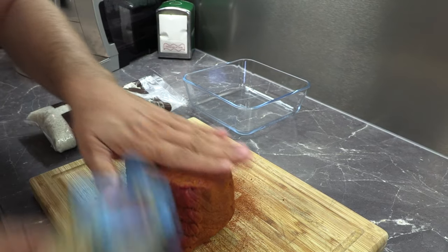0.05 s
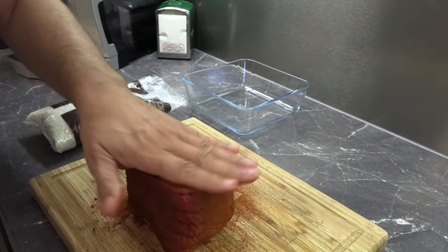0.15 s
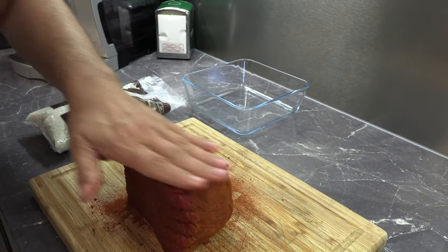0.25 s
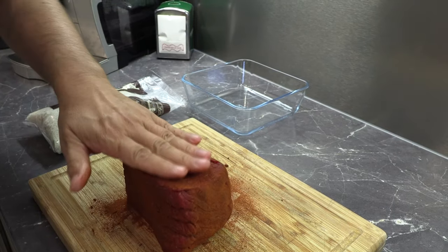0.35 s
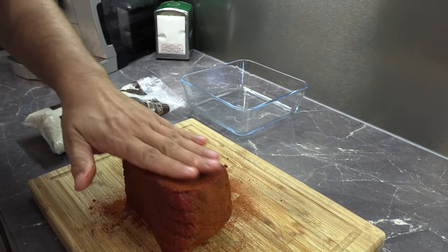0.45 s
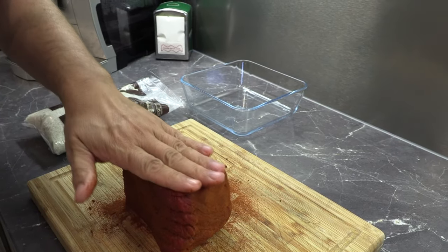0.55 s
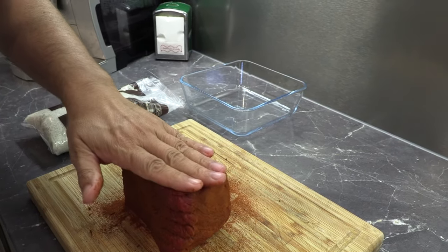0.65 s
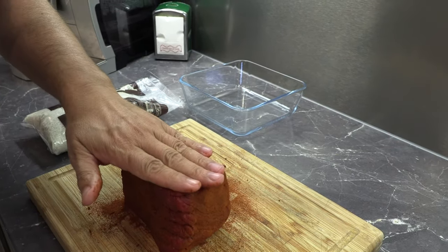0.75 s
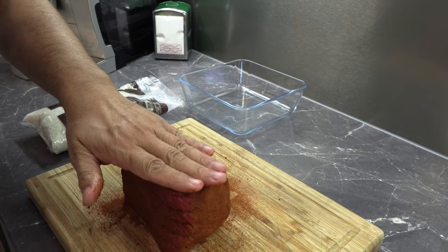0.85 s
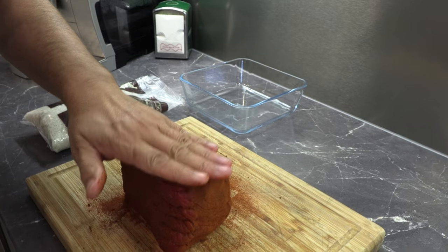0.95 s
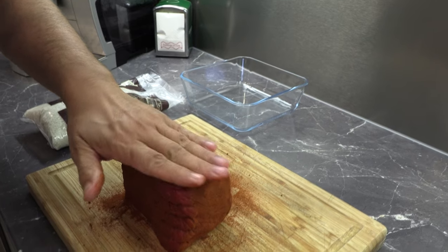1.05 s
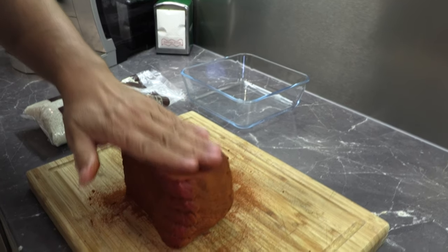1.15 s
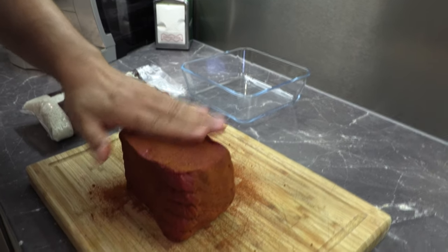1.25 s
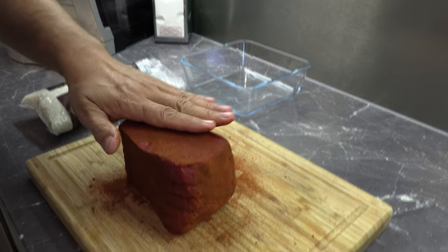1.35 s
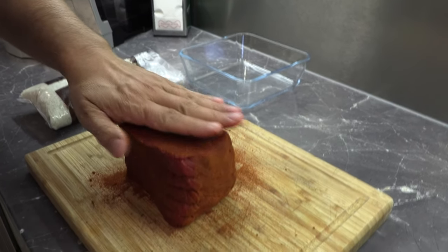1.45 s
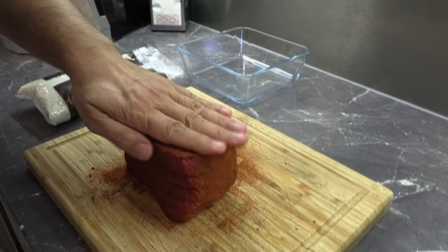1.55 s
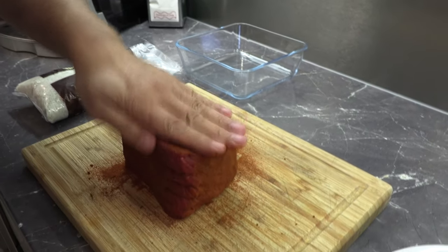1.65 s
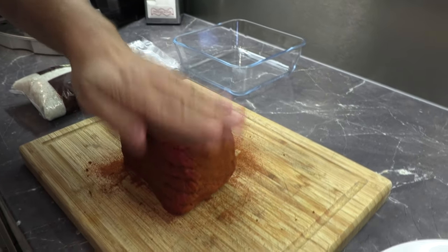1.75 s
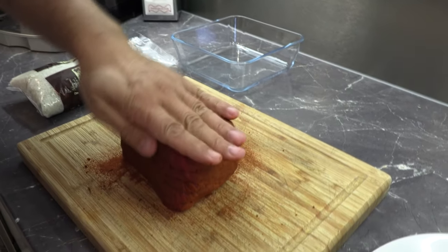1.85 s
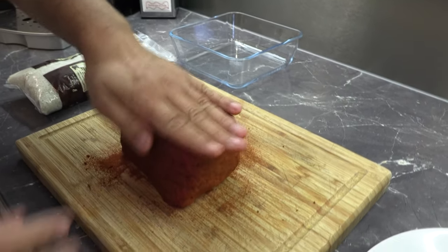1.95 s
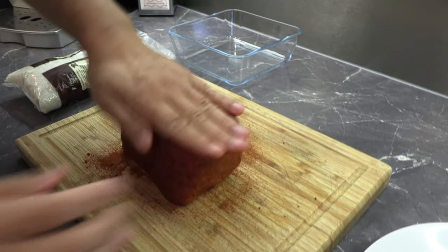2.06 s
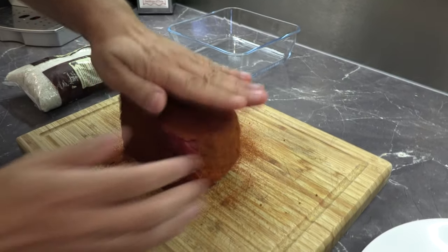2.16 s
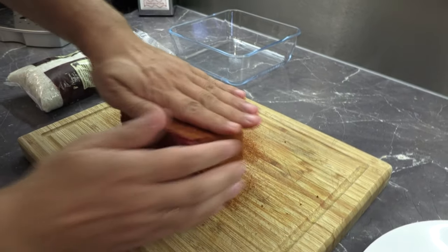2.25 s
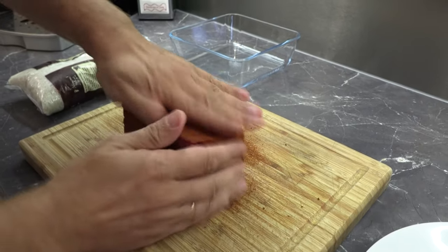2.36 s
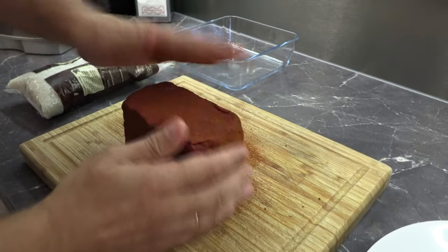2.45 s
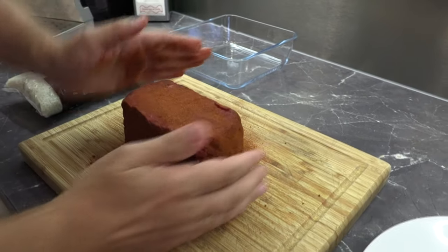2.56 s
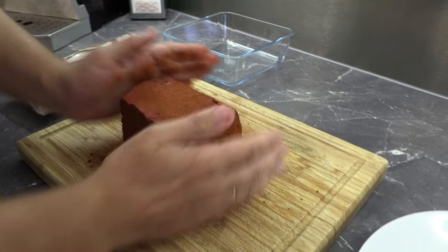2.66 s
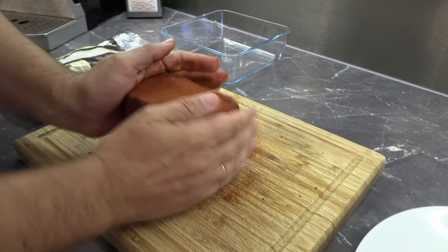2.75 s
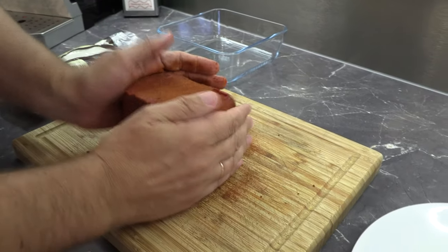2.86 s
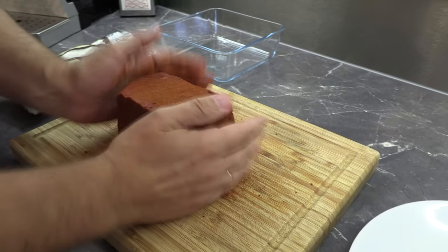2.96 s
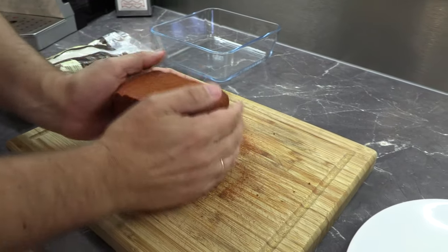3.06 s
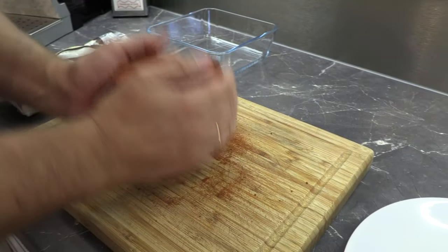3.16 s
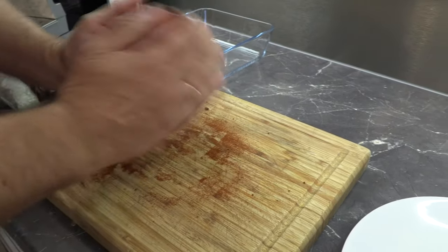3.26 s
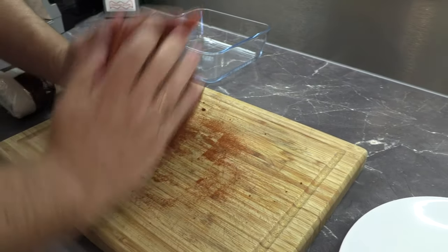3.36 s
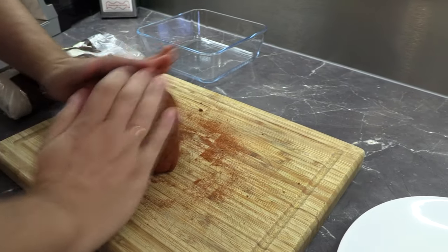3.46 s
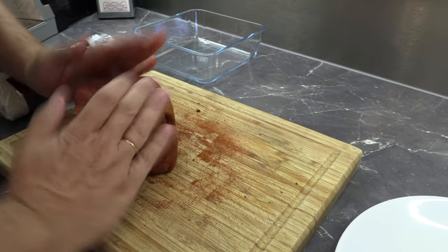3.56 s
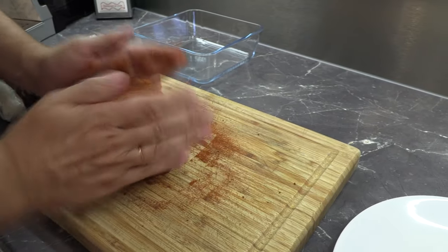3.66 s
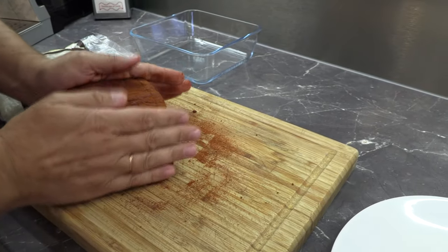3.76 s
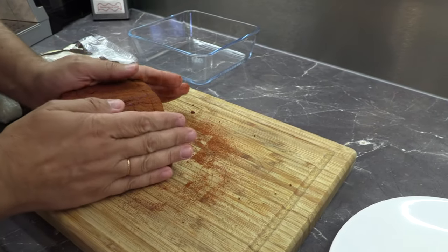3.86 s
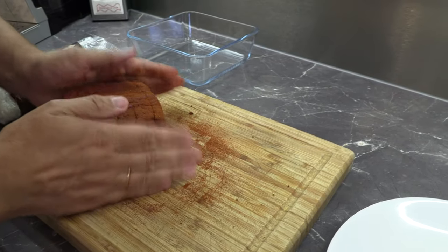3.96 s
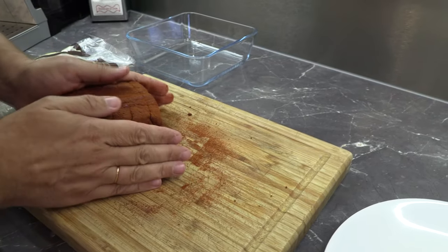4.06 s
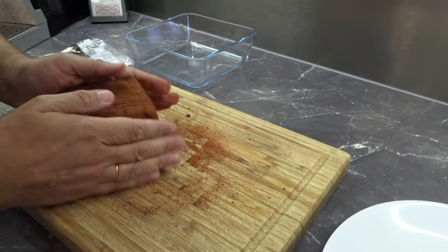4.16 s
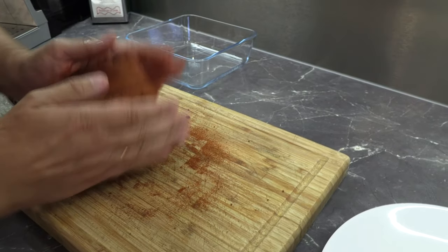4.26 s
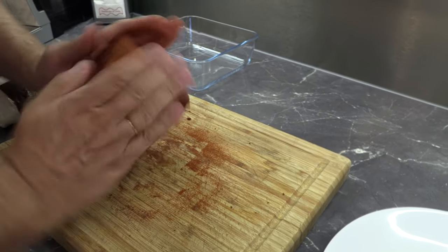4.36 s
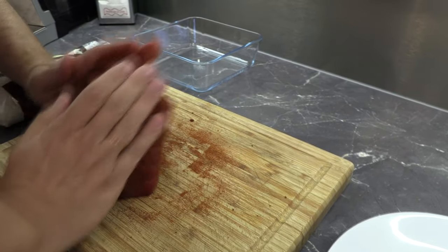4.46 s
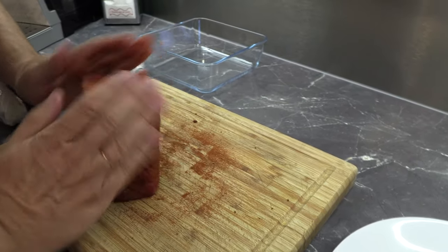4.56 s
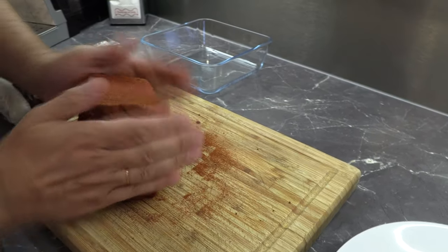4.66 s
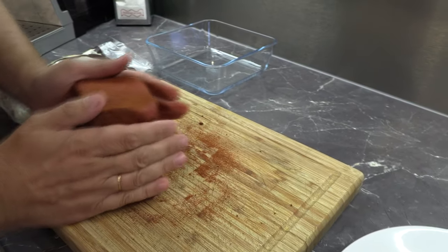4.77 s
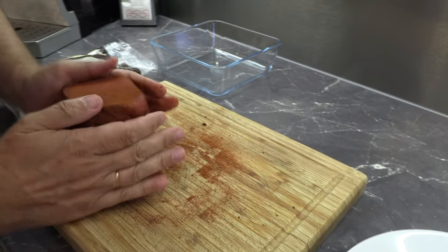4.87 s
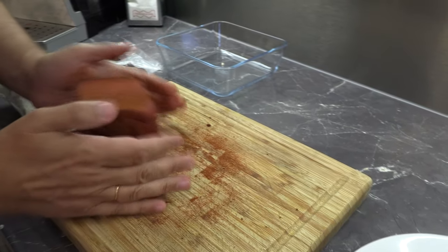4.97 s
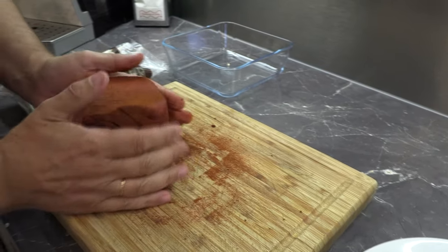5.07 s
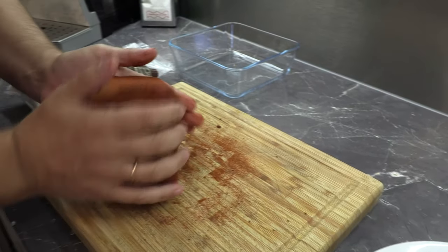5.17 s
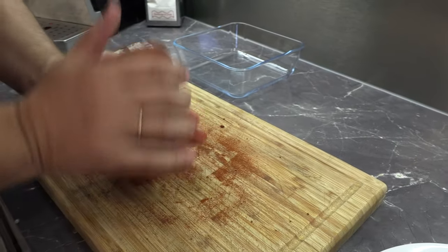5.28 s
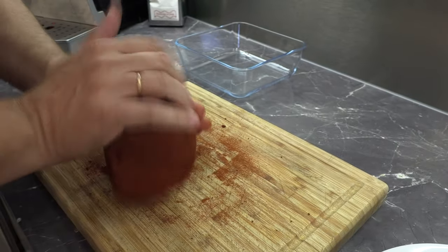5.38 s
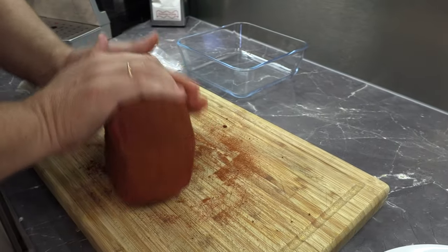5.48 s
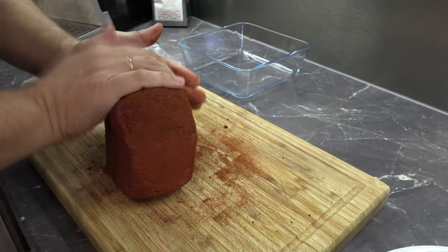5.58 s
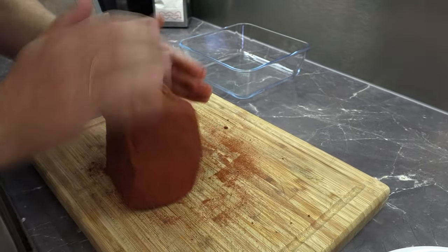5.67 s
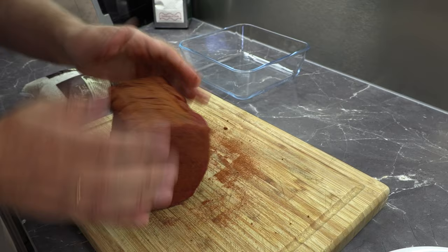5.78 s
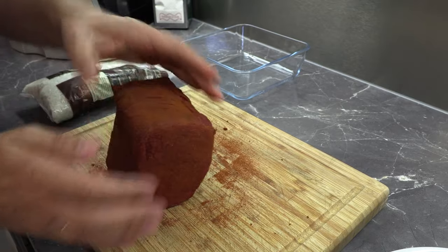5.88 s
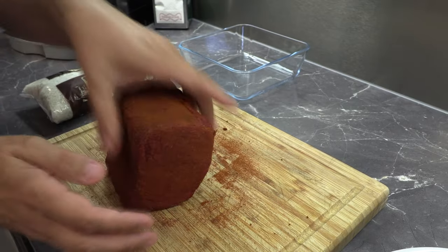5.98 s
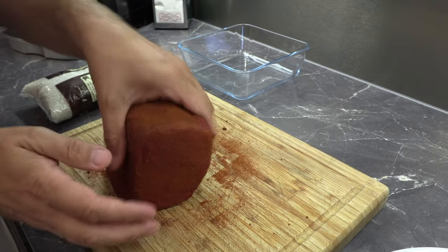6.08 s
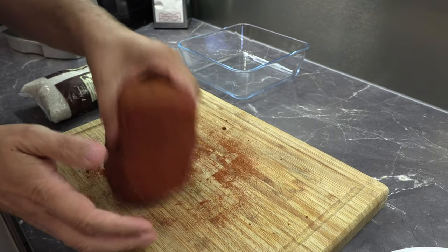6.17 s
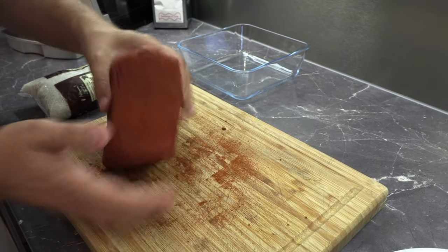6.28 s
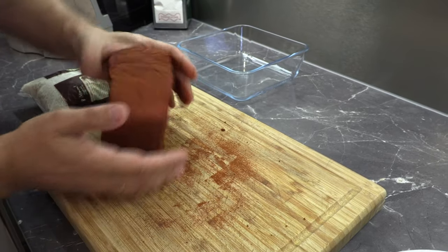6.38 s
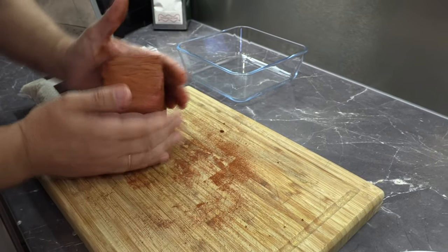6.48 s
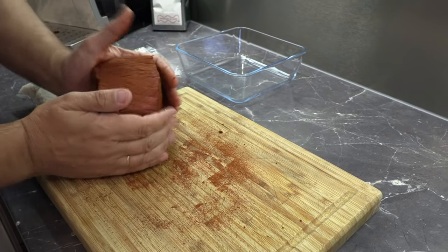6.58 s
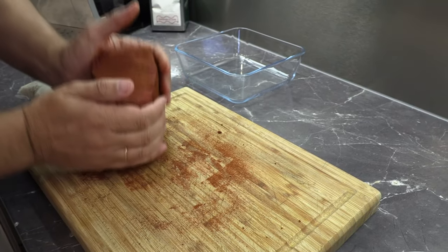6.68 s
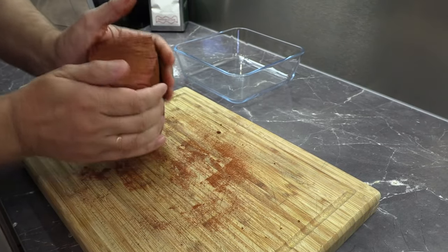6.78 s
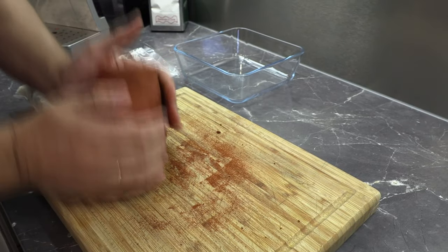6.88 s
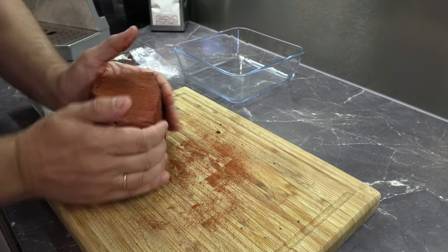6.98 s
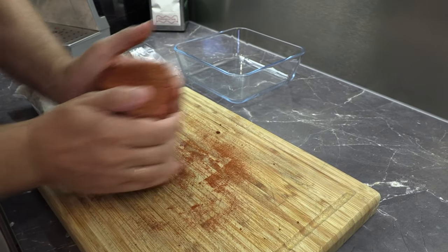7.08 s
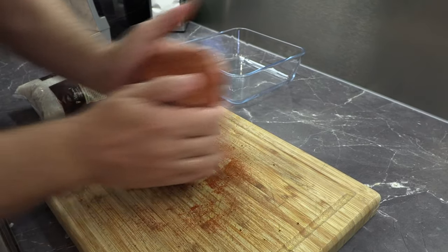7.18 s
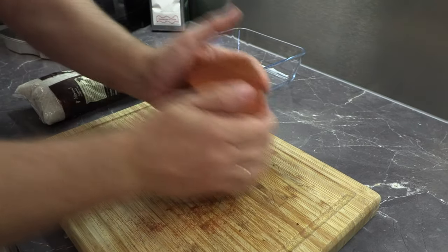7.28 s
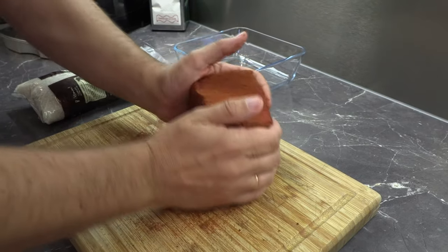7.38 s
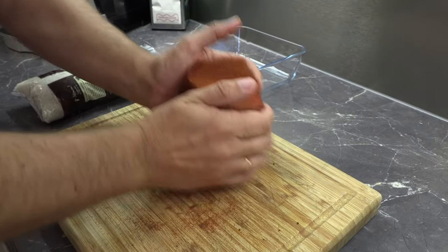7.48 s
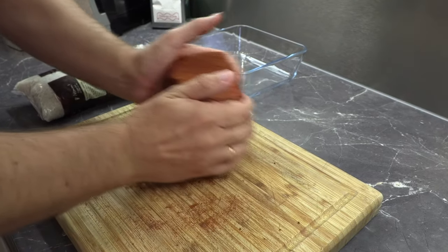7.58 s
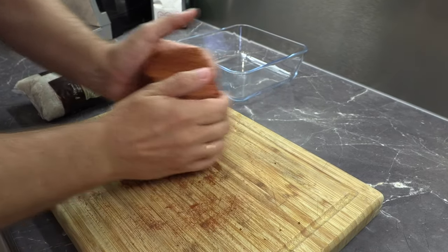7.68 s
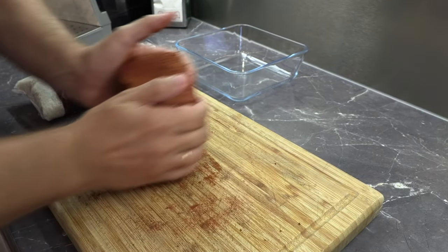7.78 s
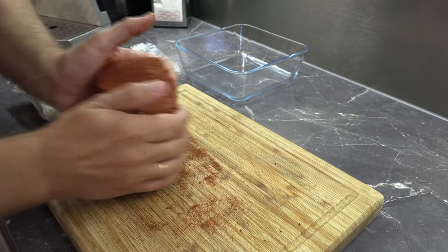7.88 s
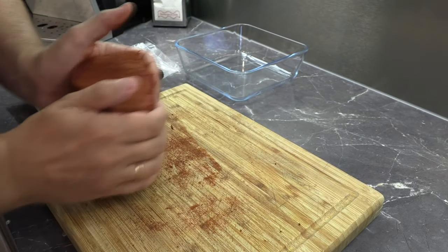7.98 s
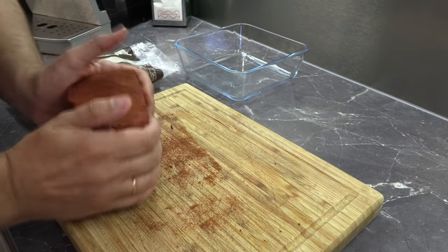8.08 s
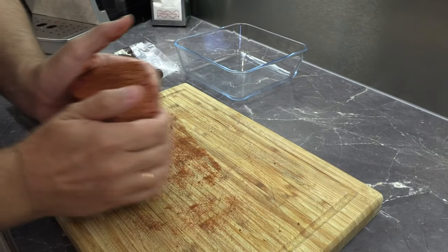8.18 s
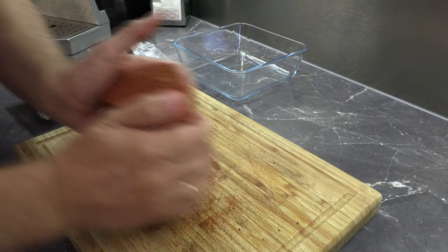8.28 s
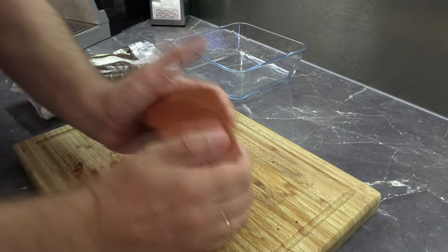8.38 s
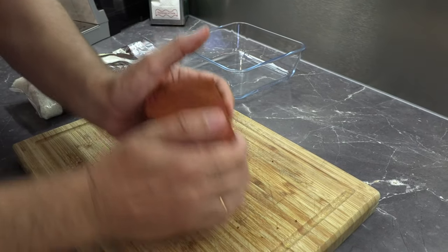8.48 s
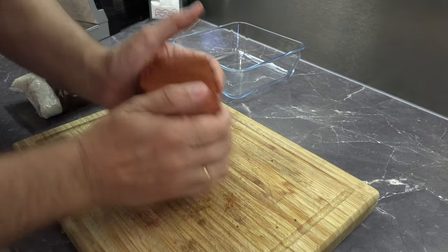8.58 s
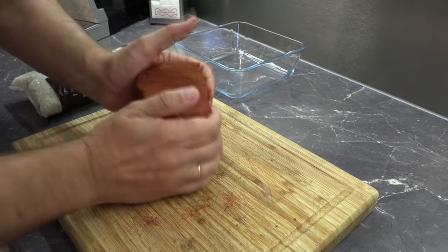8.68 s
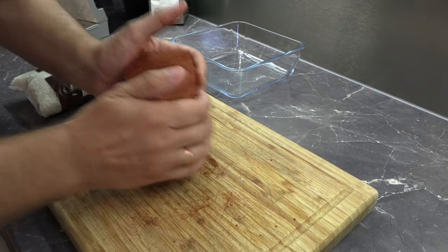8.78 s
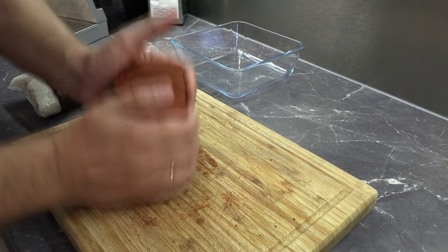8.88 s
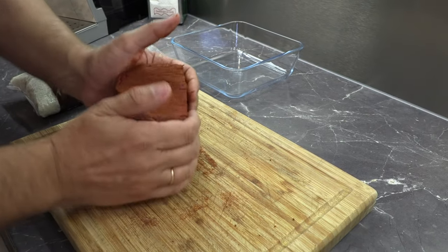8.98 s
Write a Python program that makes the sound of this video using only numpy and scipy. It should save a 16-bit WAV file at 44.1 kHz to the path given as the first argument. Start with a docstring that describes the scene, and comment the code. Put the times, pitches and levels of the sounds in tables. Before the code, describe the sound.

Close kitchen handling: hollow box clacks, a brief glassy ring, a sharp meaty slam, then uneven pats, board knocks and dry powdery rubbing.

```python
"""A box clacks down on a stone counter and a nudged dish rings; then meat thuds and a board knocks.
Two hands turn the spice-coated meat and tamp it on the wooden board, while powder rasps under the palms.
Blows are a snap plus random small contacts, coloured by a resonant body; rasps are grainy noise.
Ringing things are fading sine waves, and trapped air pops in short notes.
A small, hard kitchen answers with echoes and reverb, over quiet air and a deep rumble."""
import sys
import numpy as np
from scipy import signal
from scipy.fft import rfft, irfft
from scipy.io import wavfile
from scipy.ndimage import uniform_filter1d

SR = 44100
rng = np.random.default_rng(int(sys.argv[2]) if len(sys.argv) > 2 else 0)


def to_wav(sig):
    """Store sig (one row per channel, or 1-D mono) as 16-bit WAV at the path in sys.argv[1].

    Samples outside -1..1 are clipped; the rate is SR.
    """
    pcm = np.clip(np.atleast_2d(sig), -1, 1) * 32767
    pcm = np.round(pcm).astype(np.int16)
    wavfile.write(sys.argv[1], SR, pcm.T)  # frames by channels


N = 398223  # length in samples

# Levels in the tables and settings are those before the mixing gains in the functions.

# Room air. Each row: frequency in Hz, level in dB per Hz.
AIR_SPECTRUM = [(60, -14), (130, -13), (250, -6), (450, -7.5), (800, -11.5), (1400, -10.5), (2300, -8),
                (3200, -13), (5000, -17), (7500, -20), (9500, -25), (15500, -33)]
# Steady drone of the kitchen. Each row: frequency in Hz, width in Hz, lift in dB.
AIR_RESONANCES = [(117.8, 10, 4), (330, 12, 6), (620, 41, 6), (1844, 100, 8.5)]
# Noise in the two microphones. Each row: frequency in Hz, left minus right in dB.
NOISE_SHADE = [(100, 3), (250, -4.5), (500, -6.5), (1000, -11), (2000, -15), (4000, -5.5), (8000, -5.5),
               (12000, 3)]
# Deep rumble. Each row: frequency in Hz, level in dB per Hz.
RUMBLE_SPECTRUM = [(8, -48), (20, 6), (29, 3), (40, -14), (60, -20), (100, -36.5), (200, -50.5),
                   (600, -100)]
AIR_DB, RUMBLE_DB = -60, -49
SWELL_AT_S, SWELL_WIDTH_S, SWELL_DB = 2.1498, 0.17, 17.5  # one deep low-frequency swell

# How long the room rings. Each row: frequency in Hz, time to fall by 60 dB in seconds.
ROOM_FADE = [(100, 0.5194), (200, 0.15), (350, 0.34), (700, 0.58), (1800, 0.6), (4500, 0.48), (8000, 0.4),
             (15000, 0.35)]
# Colour of the reverb. Each row: frequency in Hz, level in dB.
ROOM_COLOUR = [(60, 4), (200, 3), (450, -0.5), (900, -4), (1600, -2.5), (3000, -5.5), (7500, -1.5),
               (14000, -3)]
# Resonances of the room. Each row: frequency in Hz, width in Hz, lift in dB.
ROOM_RESONANCES = [(112.93, 27, 2.2), (590, 130, 3), (1110, 200, 1.9)]
# Echoes from the nearest walls. Each entry: delay in seconds.
ECHO_DELAYS = [.00545, .007, .0105, .0173]
# Strength of those echoes. Each entry: level in dB.
ECHO_LEVELS = [-12.5, -24.5, -15, -19]
ECHO_CORNER_HZ = 2200

# Ringing of the counter. Each row: frequency in Hz, time to fall by 60 dB in seconds, level in dB,
# swell time in seconds, how much higher the pitch starts in Hz (negative starts lower).
COUNTER_MODES = [(119.01, 0.45, -18.5, .004, 1.5), (163, 0.25, -14, .008, 16), (317.7, 0.2, 0.5, 0.02, 25),
                 (564, 0.55, -15.5, .004, -9.5), (1114, 0.44, -26, .004, 0.5)]
BEND_S = 0.03  # time for the pitch to settle

# Ringing of the dish. Each row: frequency in Hz, level in dB, time to fall by 60 dB in seconds.
DISH_MODES = [(1098, -6, .35), (1631, -8.5, 1.75), (2250, -2, 1.1), (2961, -2, .55), (3806, -17, .42),
              (4748, -12, .31), (6056, -19, .45), (7418, -19, .38), (8210, -14, .24)]
# Touches of the dish. Each row: start in seconds, level in dB.
DISH_NUDGES = [(1.441, -56), (1.514, -33.5)]
DISH_BASE_SPLIT_HZ, DISH_TWIN_DB = 11, -13  # each mode has a weaker twin; the split varies around this
TINK_AT_S, TINK_HZ, TINK_T60_S, TINK_DB = 5.487, 2190, 0.19, -36

# Blows spread over two microphones. Each row: frequency in Hz, left minus right in dB.
BLOW_SHADE = [(120, 6), (250, -1), (500, 3), (1000, -12), (2000, -13.5), (4000, -7.5), (8000, -11),
              (12000, 4)]
# How alike left and right are in a blow. Each row: frequency in Hz, likeness from 0 to 1.
BLOW_LIKENESS = [(100, 0.85), (500, 0.6807), (1000, 0.49), (2000, 0.89), (5000, .6), (12000, .4)]

# Box on the counter. Each row: start in seconds, level in dB, contact corner in Hz, bass in dB,
# rise in seconds, hollow resonance in Hz, hollow lift in dB.
BOX_CONTACTS = [(0.4737, -21.5, 5650, 2, 0.0003, 2330, 1.5), (.562, -37, 2186, 15, 0.0022, 603.2, 13),
                (0.6207, -22, 6936, -3, 0.0047, 1950, 4), (0.8298, -31.5, 12410, 5, 0.0003, 2860, 0.5),
                (0.8529, -30, 3000, 13.5, 0.0004, 710, 9), (.866, -38.5, 1195, 17, 0.002, 239, 10),
                (1.4177, -24.5, 6540, 0.5, 0.0003, 587.3, 10.5),
                (1.4215, -21.5, 6540, -1, 0.00039, 1300, 6.5), (1.4418, -22, 6906, 0.5, 0.00082, 1280, 8.5),
                (1.449, -28, 5000, -5, 0.00084, 560, 8), (1.458, -25, 4997, -6, 0.001, 288, 15.5),
                (1.5127, -27.5, 12000, -5, 0.0025, 536, 16)]
# Colour of the hollow box. Each row: frequency in Hz, level in dB per Hz.
BOX_COLOUR = [(50, -46), (130, -22), (250, -12.5), (450, -6.5), (1300, -3), (1900, -2.5), (2500, 0),
              (3100, -5), (3700, -15), (5500, -24.5), (8000, -27.5), (9500, -30.5), (15000, -46)]
# Resonances of the box. Each row: frequency in Hz, width in Hz, lift in dB.
BOX_RESONANCES = [(614, 38.1, 2), (780, 160, 3.5), (1234, 110, 3), (1473, 60, 2.5), (2340, 180, 0),
                  (5350, 400, 5), (7900, 900, 4.5)]
# How far each source stands toward the right microphone, on a scale of 0 to 1.5.
BOX_SIDEWAYS, KNOCK_SIDEWAYS, PAT_SIDEWAYS = 0.77, 0.71, 0.72

# Palms and meat rubbing in the powder. Each row: start in seconds, length in seconds, level in dB.
POWDER_RUBS = [(0.972, 0.063, -51.5), (1.251, 0.1, -67), (2.113, 0.024, -63.5), (2.191, 0.029, -61.5),
               (2.599, 0.12, -67), (2.696, 0.007, -55), (3.034, 0.11, -59), (3.547, 0.049, -58),
               (4.07, 0.052, -58.5), (4.169, 0.06959, -51), (4.221, 0.17, -63.5), (5.079, 0.041, -56),
               (6.344, 0.16, -62.5), (7.51, 0.41, -55.5)]
# Colour of the powder grains. Each row: frequency in Hz, level in dB per Hz.
GRIT_SPECTRUM = [(150, -5.5), (600, 1.5), (1500, 3), (2500, 5.5), (4500, -3), (8000, -9), (10000, -16),
                 (15000, -23.5)]
PUFF_S, PUFF_LEAD_S = 0.038, 0.006  # a pat's scuff starts just before it lands
PUFF_DB, PUFF_AT_HZ, PUFF_DB_PER_OCTAVE = -58.5, 3000, 2.5  # brighter contacts scuff more

# Air squeezed out from under the meat. Each row: time of the peak in seconds, pitch in Hz, level in dB.
AIR_POPS = [(5.489, 830, -25.5), (7.384, 845, -45), (8.1115, 870, -28), (8.7325, 827, -27)]
POP_S = 0.0035  # half the length of a pop

# Colour of the board. Each row: frequency in Hz, level in dB per Hz.
BOARD_COLOUR = [(40, -26.5), (100, -3), (180, 0.5), (280, -1.5), (450, -1.5), (800, 1), (1300, -3),
                (1700, -3), (2150, -2), (2700, -5.5), (3700, -16), (8000, -27), (10000, -37.5),
                (15000, -50.5)]
# Resonances of the board. Each row: frequency in Hz, width in Hz, lift in dB.
BOARD_RESONANCES = [(207, 70, 1.7), (336, 60, 4.4), (565, 70, 5.5), (715, 50, 2.5), (882.3, 60, 1.8),
                    (1110, 56, 2.5), (1304, 89, 4), (1480, 90, 2), (2090, 200, 2.8)]
# The board knocks on the counter. Each row: start in seconds, level in dB.
BOARD_KNOCKS = [(6.499, -27), (6.6577, -28), (7.4121, -35.5), (7.6377, -22.5), (8.7593, -28.5)]
KNOCK_CORNER_HZ, KNOCK_AT_DB, KNOCK_DB_PER_OCTAVE = 1740, -24, 13.5  # harder knocks are brighter
KNOCK_RISE_S, KNOCK_BASS_DB, KNOCK_THUMP_DB = 0.0002479, -1.5, -41.5
KNOCK_HOLLOW_HZ, KNOCK_HOLLOW_DB = 1280, 5.5  # the resonance that knocks favour
KNOCK_ALIKE = 0.72  # weight of the fine texture that all knocks have in common, 0 to 1

# Landings of meat and palms, mostly soft, with one hard slam, right after which the board knocks on the counter
# (the 3.492 s row). Each row: start in seconds, level in dB, # contact corner in Hz, bass in dB, rise in
# seconds, thump level in dB, hollow resonance in Hz, # hollow lift in dB.
MEAT_PATS = [(1.846, -55.5, 6086, 13, 0.0043, -49.5, 479, 13),
             (2.279, -48.5, 6200, 10, 0.0018, -49, 1900, 7), (2.575, -60, 500, 16.5, 0.033, -51, 200, -3),
             (3.105, -48.5, 700, 11.5, 0.014, -48, 250, -0.5),
             (3.46, -42, 2517, 3, 0.0051, -36.5, 850, 6.5),
             (3.4872, -20, 3040, -6, 0.0022, -36.5, 174.4, 11),
             (3.492, -19, 2450, 1, 0.0012, -36.5, 860, 7), (3.79, -53.5, 4203, 10, 0.0048, -53, 300, -6),
             (4.097, -56, 1200, 7, 0.012, -48, 330, -2), (4.494, -54, 1300, 10, 0.0075, -48.5, 400, 3.5),
             (4.77, -64, 1200, -2, 0.008, -52, 602, 10), (5.088, -55, 1200, 11, 0.018, -40, 585, 5),
             (5.4834, -32.5, 3600, 13, 0.0036, -29, 650, 4.5),
             (6.725, -30.5, 1197, 7, 0.0023, -43, 1007, 7), (6.941, -41, 1800, 4, 0.0061, -51, 493, 6),
             (6.983, -38.5, 902.1, 9.5, 0.0023, -46, 322, 7), (7.379, -47, 1700, 22, 0.0042, -41.5, 840, 0),
             (7.567, -40.5, 889, 10.5, 0.0045, -47.5, 333.4, 2.5),
             (8.105, -41, 2216, 10, 0.0048, -31, 643, 7.5), (8.437, -39.5, 1909, 11.5, 0.0061, -37, 400, 6),
             (8.728, -39.5, 1498, -9, 0.0033, -32.5, 650, 2),
             (8.836, -37, 937.5, 14, 0.0034, -44.5, 330, 7),
             (8.946, -38, 1446, 10.5, 0.0072, -35, 790.4, 8)]


def amp(db):
    """Turns decibels into gain."""
    return 10 ** (np.asarray(db) / 20)


def unit(x):
    """Scales a sound to an rms of 1."""
    return x / np.sqrt(np.mean(x ** 2) + 1e-20)


def read(points, hz):
    """Reads a table of values over frequency, on a log-frequency axis."""
    f, value = np.transpose(points)
    return np.interp(np.log(hz + 1), np.log(f + 1), value)


def lift(modes, hz):
    """Gives the decibels that a set of resonances adds."""
    return sum(db / (1 + (2 * (hz - centre) / width) ** 2) for centre, width, db in modes)


def blend(a, b, same):
    """Mixes b into a, keeping a likeness to a of `same`."""
    return same * a + np.sqrt(1 - same ** 2) * b


def add(mix, s, sound):
    """Mixes a stereo sound in at time s."""
    part = mix[:, round(s * SR):][:, :sound.shape[1]]
    part += sound[:, :part.shape[1]]


def causal(gain):
    """Minimum-phase response with this gain: it rings only after the blow."""
    log_gain = np.log(np.maximum(gain, 1e-6))
    circle = np.concatenate([log_gain, log_gain[..., -2:0:-1]], -1)
    return np.exp(np.conj(signal.hilbert(circle)))[..., :gain.shape[-1]]


def noise(spectrum, count, same, modes=()):
    """Stereo noise of a given colour and left-right likeness, shaded on the left."""
    a, b = rng.standard_normal((2, count))
    hz = np.fft.rfftfreq(count, 1 / SR)
    pair = np.array([blend(a, b, same), a])
    shade_db = np.outer([1, 0], read(NOISE_SHADE, hz))
    colour_db = read(spectrum, hz) + lift(modes, hz) + shade_db
    return unit(irfft(rfft(pair) * amp(colour_db), count))


def texture(size=8192):
    """The random small contacts of one place of impact."""
    return rng.standard_normal((2, size))


def strike(contact, grain, body, modes, snap, fade_s, ring_s, ring, slope, leak_db, rustle_db):
    """One contact: a first snap and a dying scatter of small contacts excite a resonant body."""
    db, corner_hz, bass_db, rise, sideways, hollow_hz, hollow_db = contact
    size = grain.shape[1]
    t, hz = np.arange(size) / SR, np.fft.rfftfreq(size, 1 / SR)
    after = np.maximum(t - rise, 0)
    hardness = 1 / (1 + rise / 0.00054)

    # Slow landings also let go slowly.
    release = np.exp(-after / np.hypot(fade_s, 0.7 * rise)) + ring * np.exp(-after / ring_s)
    scatter = np.minimum(t / rise, 1) * release * grain
    scatter[0, round(rise * SR)] += snap * hardness  # soft landings have little snap
    a, b = rfft(scatter)
    pair = np.array([blend(a, b, np.clip(read(BLOW_LIKENESS, hz), 0, 1)), a])
    # Dividing by this leaves the broad colour to the target curve below.
    broad = np.sqrt(uniform_filter1d(abs(pair) ** 2, size=21, axis=1))

    # The harder the contact, the more its own slope sets the upper edge.
    steepness = slope * hardness + 5.8 * (1 - hardness)
    softness = 1 / np.sqrt(1 + (hz / corner_hz) ** steepness)
    softness = softness + amp(leak_db + rustle_db * (1.5 - hardness))  # some treble leaks through
    hollow = [(hollow_hz, 0.32 * hollow_hz, hollow_db)]  # each place favours one resonance
    resonance_db = lift(list(modes) + hollow, hz)
    colour = amp(read(body, hz) + resonance_db + bass_db / (1 + (hz / 290) ** 4)) * softness
    shade = amp(np.outer([1, 0], sideways * read(BLOW_SHADE, hz)))
    sound = irfft(pair * causal(colour * shade / broad))
    first = round(0.024 * SR)  # the first moments set the level
    return amp(db) * sound / np.sqrt(np.mean(sound[:, :first] ** 2))


def background():
    """Quiet room air over a deep rumble that swells once; both are coloured noise."""
    swell = np.exp(-((np.arange(N) / SR - SWELL_AT_S) / SWELL_WIDTH_S) ** 2)
    air = amp(AIR_DB - 1.0) * noise(AIR_SPECTRUM, N, same=0.13, modes=AIR_RESONANCES)
    rumble = amp(RUMBLE_DB + SWELL_DB * swell) * noise(RUMBLE_SPECTRUM, N, same=0.45)
    return air + rumble * amp([[0], [-14]])  # the rumble is weaker on the right


def kitchen(x, build_s, left_db, count=3):
    """Dense reflections build up and die band by band; their mix turns steadily with time."""
    t, out = np.arange(SR) / SR, np.zeros((2, N))
    hz = np.fft.rfftfreq(SR, 1 / SR)
    colour = amp(read(ROOM_COLOUR, hz) + lift(ROOM_RESONANCES, hz))
    for k in range(count):
        a, b = rfft(rng.standard_normal((2, SR)))
        same = 1 / (1 + (hz / 900) ** 2)  # long waves reach both microphones alike
        pair = irfft([blend(a, b, same), a], SR)
        f, age, bands = signal.stft(pair, SR, nperseg=256)
        fading = bands * amp(-60 * age / read(ROOM_FADE, f)[:, None])
        tail = signal.istft(fading, SR, nperseg=256)[1][:, :SR]
        z = rfft(tail * (1 - np.exp(-(t / build_s) ** 2)))
        broad = np.sqrt(uniform_filter1d(abs(z) ** 2, size=35, axis=1) + 1e-12)
        tail = irfft(z * causal(colour / broad))
        turn = np.sqrt(2 / count) * np.cos(np.pi * (np.arange(N) / SR + k / count))
        out += signal.oaconvolve((x * turn)[None], tail, axes=1)[:, :N]
    return out * amp([[left_db], [0]])


def echoes(x):
    """The nearest walls throw each sound back duller, which ripples its colour."""
    out = np.zeros((2, N))
    dull = signal.sosfilt(signal.butter(1, ECHO_CORNER_HZ, fs=SR, output="sos"), x)
    for delay_s, db in zip(ECHO_DELAYS, ECHO_LEVELS):
        add(out, delay_s, amp(db) * dull)
    return out


def worktop(x):
    """Every blow rings a few modes of the counter; they swell, settle in pitch and die."""
    t, modes = np.arange(SR) / SR, 0
    for hz, t60, db, swell_s, bend_hz in COUNTER_MODES:
        envelope = amp(db - 60 * t / t60) * (1 - np.exp(-t / swell_s))
        pitch_hz = hz + bend_hz * np.exp(-t / BEND_S)
        modes = modes + envelope * np.cos(2 * np.pi * np.cumsum(pitch_hz) / SR)
    return signal.oaconvolve(x, amp(-47) * modes)[:N] * amp([[-4], [0]])


def dish():
    """A few close pairs of modes ring on and beat after each touch."""
    out, t = np.zeros((2, N)), np.arange(2 * SR) / SR
    for s, level_db in DISH_NUDGES:
        ring = 0
        for hz, db, t60 in DISH_MODES:
            twin_hz = hz + DISH_BASE_SPLIT_HZ * rng.uniform(0.9, 1.4)
            for tone_hz, pair_db in [(hz, 0), (twin_hz, DISH_TWIN_DB)]:
                turns = tone_hz * t + rng.random((2, 1)) / 4  # each side starts at its own phase
                ring = ring + amp(db + pair_db - 60 * t / t60) * np.sin(2 * np.pi * turns)
        add(out, s, amp(level_db) * ring * amp([[-6], [0]]))
    return out


def tink():
    """A landing jolts something loose on the counter, which rings briefly as one fading sine."""
    out, t = np.zeros((2, N)), np.arange(SR) / SR
    ring = amp(TINK_DB - 60 * t / TINK_T60_S) * np.sin(2 * np.pi * TINK_HZ * t)
    add(out, TINK_AT_S, ring * amp([[-6], [0]]))
    return out


def box():
    """The light box clacks down on stone, corner after corner."""
    out = np.zeros((2, N))
    for s, db, corner_hz, bass_db, rise, *hollow in BOX_CONTACTS:
        contact = (db, corner_hz, bass_db, rise, BOX_SIDEWAYS, *hollow)
        add(out, s, strike(contact, texture(), BOX_COLOUR, BOX_RESONANCES, snap=6.341, fade_s=0.0045,
                           ring_s=0.015, ring=0.3, slope=5.2, leak_db=-27, rustle_db=4))
    return out


def powder():
    """Dry grains catch and slip under each stroke, and briefly under each pat."""
    out, puffs = np.zeros((2, N)), []
    for s, _, corner_hz, *_ in MEAT_PATS:
        puff_db = PUFF_DB + PUFF_DB_PER_OCTAVE * np.log2(corner_hz / PUFF_AT_HZ)
        puffs.append((s - PUFF_LEAD_S, PUFF_S, puff_db))
    for s, length, db in list(POWDER_RUBS) + puffs:
        count = round(length * SR)
        grains = amp(0.68 * unit(uniform_filter1d(rng.standard_normal(count), size=60)))
        stroke = np.sin(np.linspace(0, np.pi, count)) ** 1.2
        add(out, s, amp(db) * unit(noise(GRIT_SPECTRUM, count, same=0.54) * grains * stroke))
    return out


def pops():
    """Air trapped under the meat escapes with a short, hollow note."""
    out, t = np.zeros((2, N)), np.arange(-SR // 50, SR // 50) / SR
    for s, hz, db in AIR_POPS:
        note = np.exp(-(t / POP_S) ** 2) * np.sin(2 * np.pi * hz * t)
        add(out, s + t[0], amp(db) * note * amp([[-6], [0]]))
    return out


def thump(db, hz, fade_s, sway_base_hz, sway, sway_s):
    """The weight pushes the counter down: one deep swing and a slower sway."""
    t = np.arange(SR // 3) / SR
    push = np.sin(2 * np.pi * hz * t) * (t / fade_s) * np.exp(1 - t / fade_s)
    sway_hz = sway_base_hz * rng.uniform(0.81, 0.87)  # a little different each time
    wobble = sway * np.sin(2 * np.pi * sway_hz * t) * np.exp(-t / sway_s)
    return -amp(db + 8.0) * (push + wobble) * amp([[0], [-7]])  # thump levels get an 8 dB boost


def weight(db):
    """The deep thump under a blow on the board."""
    return thump(db, hz=67.4, fade_s=0.0077, sway_base_hz=44.471, sway=0.26, sway_s=0.099)


def knocks():
    """Blows knock the board on the counter at one spot: sudden, alike, brighter with force."""
    out, spot = np.zeros((2, N)), texture()
    for s, db in BOARD_KNOCKS:
        corner_hz = KNOCK_CORNER_HZ * 2 ** ((db - KNOCK_AT_DB) / KNOCK_DB_PER_OCTAVE)
        contact = (db, corner_hz, KNOCK_BASS_DB, KNOCK_RISE_S, KNOCK_SIDEWAYS,
                   KNOCK_HOLLOW_HZ, KNOCK_HOLLOW_DB)
        grain = blend(spot, texture(), KNOCK_ALIKE)
        add(out, s, strike(contact, grain, BOARD_COLOUR, BOARD_RESONANCES, snap=10.7, fade_s=0.0045,
                           ring_s=0.017, ring=0.15, slope=6.7, leak_db=-37.5, rustle_db=13))
        add(out, s + 0.002, weight(KNOCK_THUMP_DB))
    return out


def pats():
    """Meat and palms land, mostly with a soft thud, once with a slam that knocks the board on the counter; the
    weight follows each contact."""
    out = np.zeros((2, N))
    for s, db, corner_hz, bass_db, rise, thump_db, *hollow in MEAT_PATS:
        contact = (db, corner_hz, bass_db, rise, PAT_SIDEWAYS, *hollow)
        add(out, s, strike(contact, texture(), BOARD_COLOUR, BOARD_RESONANCES, snap=11, fade_s=0.004,
                           ring_s=0.012, ring=0.17, slope=10, leak_db=-33.5, rustle_db=13.5))
        add(out, s + 0.65 * rise, weight(thump_db))
    return out


def scene():
    """All sources, close by, with the kitchen around them."""
    direct = box() + powder() + knocks() + pats()
    popped = pops()
    to_room = direct[1] + amp(-9) * popped[1]
    room = amp(-0.6) * kitchen(to_room, build_s=0.0068, left_db=-9)
    answers = echoes(direct) + worktop(direct[1]) + room
    return background() + answers + dish() + tink() + popped + amp(1.0) * direct


def record(dry):
    """The right microphone is a little farther off with less bass; both lose the extreme treble."""
    right = np.pad(dry[1], (6, 0))[:N]  # six samples late
    right = signal.sosfilt(signal.butter(3, 90, "high", fs=SR, output="sos"), right)
    edge = signal.firwin(511, 15700, window=("kaiser", 9), fs=SR)  # low-pass, in Hz
    return signal.oaconvolve(np.array([dry[0], right]), edge[None], "same", axes=1)


dry = scene()
out = record(dry)
to_wav(out)
```